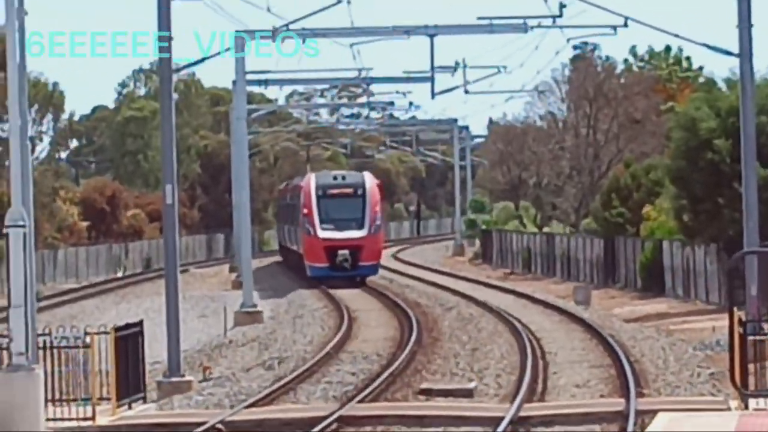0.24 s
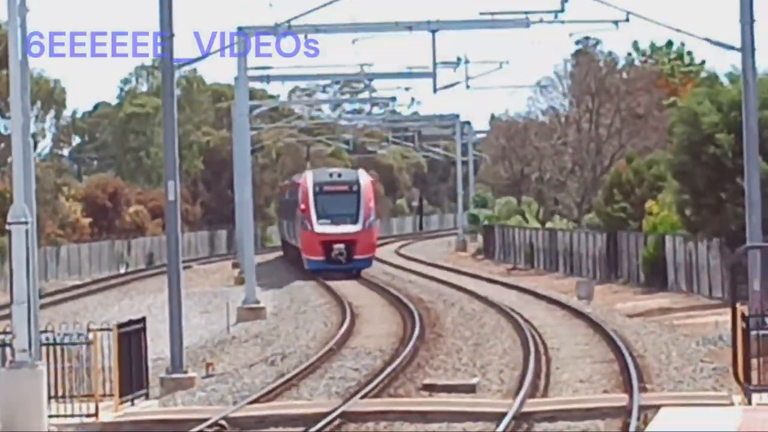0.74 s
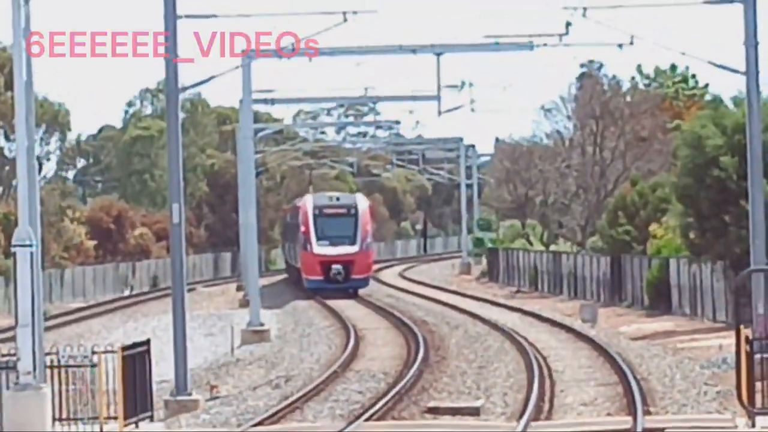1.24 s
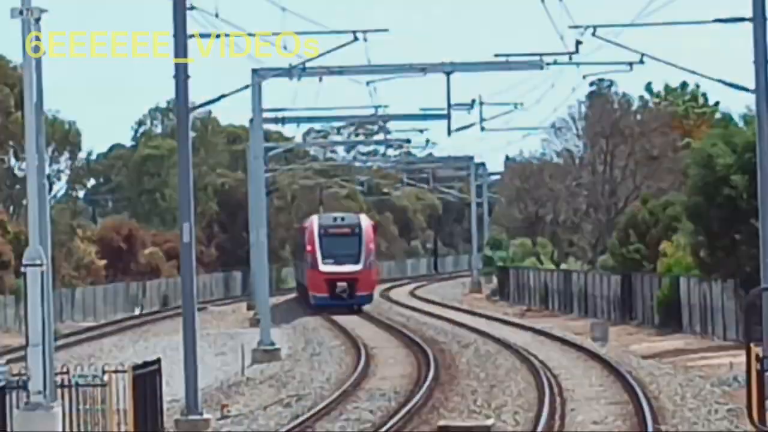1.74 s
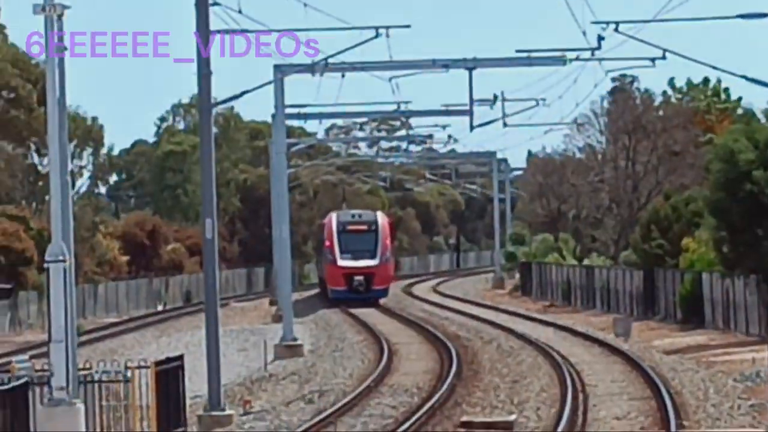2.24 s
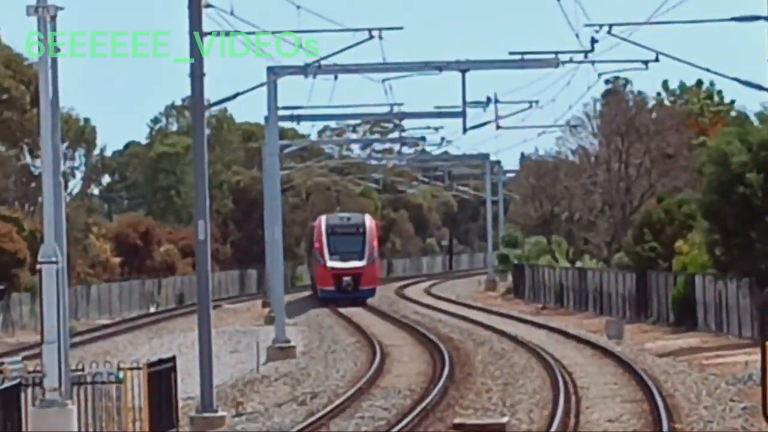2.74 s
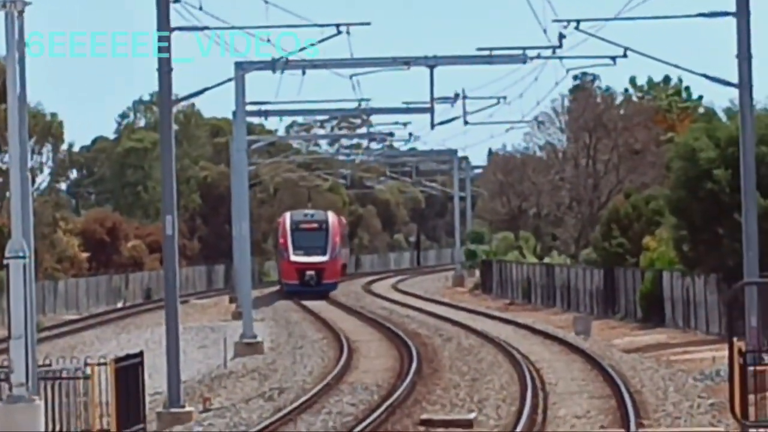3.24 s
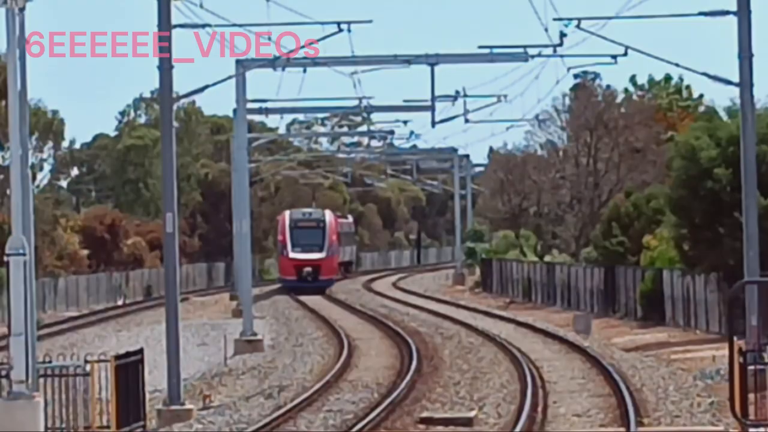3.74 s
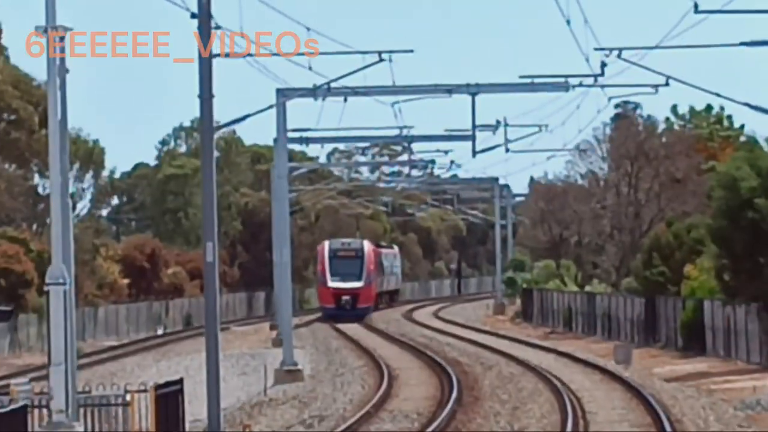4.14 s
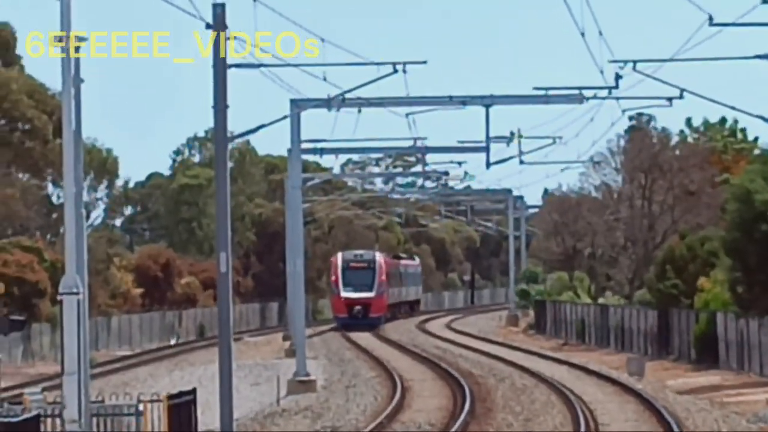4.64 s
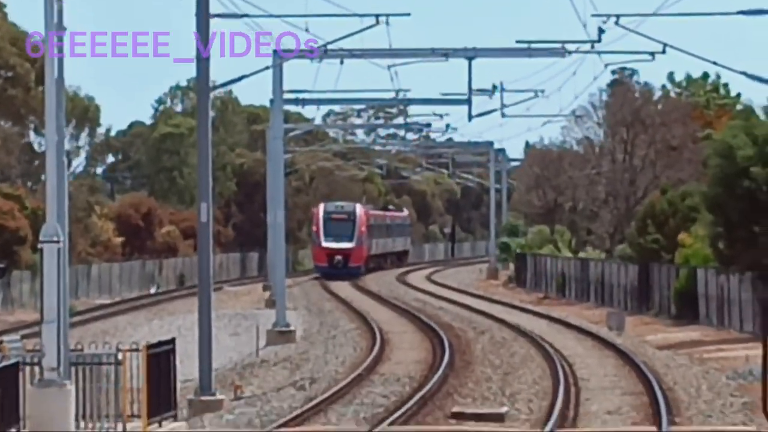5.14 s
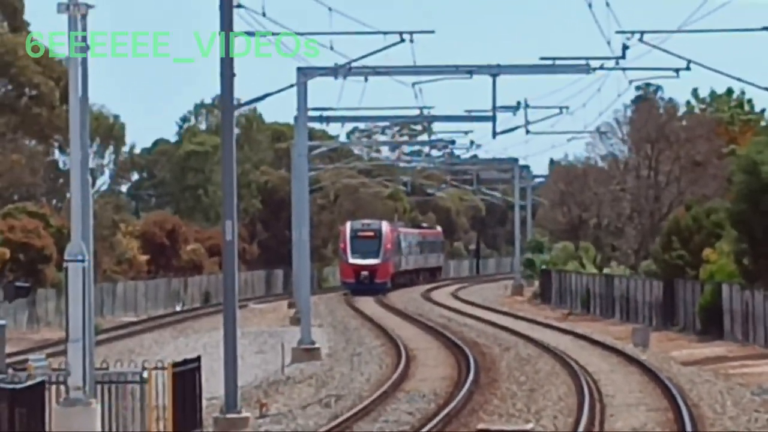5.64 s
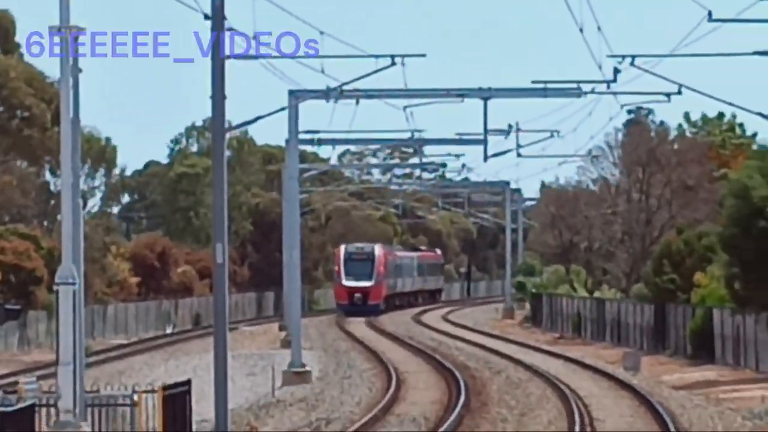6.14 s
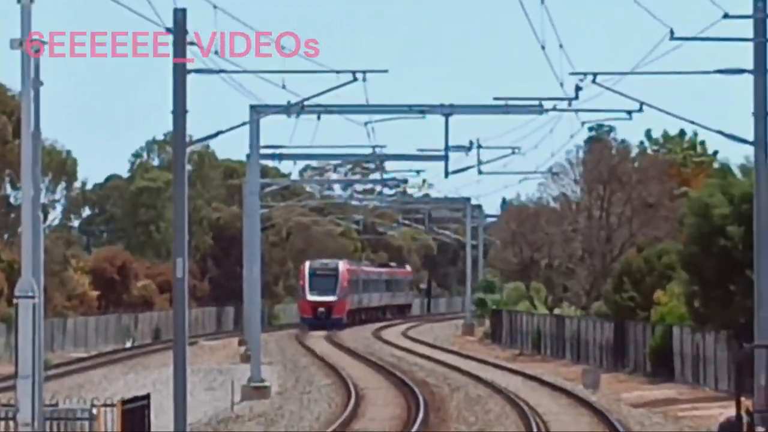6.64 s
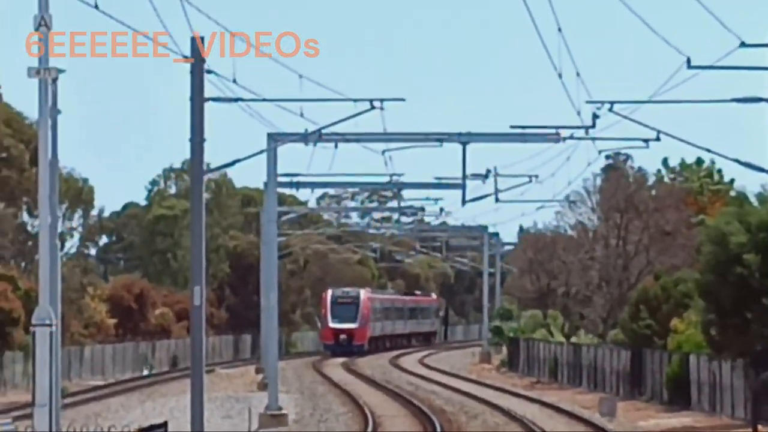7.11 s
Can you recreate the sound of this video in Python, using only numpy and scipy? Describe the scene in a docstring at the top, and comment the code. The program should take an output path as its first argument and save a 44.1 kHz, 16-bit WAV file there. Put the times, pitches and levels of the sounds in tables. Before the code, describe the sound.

An electric train rolls away round a bend, its roar fading to a faint hum while birds chirp nearby and wind buffets the microphone early.

```python
"""Beside a railway track on a breezy day: an electric train rolls away round a bend.
Its roar, rails and wheels are noise through wandering resonances, sinking to a hum over a low rumble.
Two small birds whistle upward chirps nearby, scattered by leaves, posts and trees; others peep far off.
Early on, wind noise and single eddies buffet two microphone ports, each on its own; one late eddy is faint.
Noise bursts make puffs, rustles and ticks; fine grains sizzle, thin pips hold their pitch, air washes."""
import sys
import numpy as np
from scipy import signal
from scipy.fft import rfft, irfft, next_fast_len
from scipy.io import wavfile
from scipy.ndimage import uniform_filter1d

SR = 44100
rng = np.random.default_rng(int(sys.argv[2]) if len(sys.argv) > 2 else 0)


def pcm_store(signal):
    """Save signal as 16-bit PCM."""
    levels = np.round(np.clip(np.atleast_2d(signal), -1, 1) * 32767)
    wavfile.write(sys.argv[1], SR, levels.astype(np.int16).T)


N = 325017

FRAME = 2048  # samples
HOP = FRAME // 4
HZ = np.fft.rfftfreq(FRAME, 1 / SR)
TIMES = np.arange(N // HOP + 3) * HOP / SR

# likeness of the two ports for distant sound: f/Hz, likeness/0-1
LIKENESS = [(40, 0.79), (250, 0.85), (470, 0.91), (650, 0.54), (900, 0.67), (1400, 0.04), (2300, 0.64),
            (3000, 0), (7000, 0)]
LEAVES_HZ = 4000  # foliage scatters overtones above this
RUSTLE_LEFT_DB = -25  # left minus right, rustles and sizzle


def amp(db):
    """Decibels to gain."""
    return 10 ** (np.asarray(db) / 20)


def unit(x):
    """Scales to rms 1."""
    return x / np.sqrt(np.mean(x ** 2) + 1e-20)


def read(points, hz):
    """Reads a spectrum on a log-frequency axis."""
    f, value = np.transpose(points)
    return np.interp(np.log(hz + 1), np.log(f + 1), value)


def follow(rows, axis):
    """Reads one column of a curve at every frame."""
    rows = np.array(rows)
    return np.interp(TIMES, rows[:, 0], rows[:, axis])[:, None]


def add(mix, s, sound):
    """Mixes a sound in at time s."""
    part = mix[:, max(0, round(s * SR)):][:, :sound.shape[1]]
    part += sound[:, :part.shape[1]]


def bell(f, hz, width):
    """Gain of a resonance."""
    return 1 / (1 + (2.39 * (f - hz) / width) ** 2)


def total(gain):
    """Rms of a spectral density, frame by frame."""
    return np.sqrt((gain ** 2).sum(-1, keepdims=True) * HZ[1])


def patches(size, count):
    """A smooth random field of rms 1; its kernel is size frames by count bins."""
    field = rng.standard_normal((len(TIMES), len(HZ)))
    kernel = np.outer(np.hanning(size), np.hanning(count))
    return unit(signal.fftconvolve(field, kernel, "same"))


def flutter(count):
    """A smooth random wobble within +-1 per port, changing over about count samples."""
    raw = rng.standard_normal((2, N))
    return np.tanh(unit(signal.fftconvolve(raw, np.hanning(count)[None], "same")))


def drift(size):
    """A smooth random swell of rms 1, changing over about size frames."""
    return unit(np.convolve(rng.standard_normal(len(TIMES)), np.hanning(size), "same"))[:, None]


def noise(density, likeness, lag_ms):
    """Stereo noise of a given density; the left port hears the shared part later."""
    a, b, c, d = rng.standard_normal((4, len(TIMES), len(HZ)))
    left = a + 1j * b
    same = np.clip(likeness, 0, 1)
    shared = same * left * np.exp(2j * np.pi * HZ * lag_ms / 1000)
    right = shared + np.sqrt(1 - same ** 2) * (c + 1j * d)
    z = np.array([left, right]) * density * np.sqrt(1.5 * HZ[1])
    return signal.istft(z.swapaxes(1, 2), nperseg=FRAME, noverlap=FRAME - HOP)[1][:, :N]


def burst(hz, width, count):
    """A stretch of noise in one resonance, rms 1."""
    gain = bell(np.fft.rfftfreq(count, 1 / SR), hz, width)
    return unit(irfft(rfft(rng.standard_normal(count)) * gain, count))


def swell(s, length, db, hz, width):
    """Band noise that rises and falls around time s."""
    t = np.arange(-SR, SR) / SR
    out = np.zeros((1, N + 2 * SR))  # 1 s of padding at each end
    envelope = np.exp(-(t / length) ** 2)
    add(out, s, (amp(db) * burst(hz, width, count=len(t)) * envelope)[None])
    return out[:, SR:SR + N]


def echoes(x, t60, wet_db, gap_s):
    """Nearby surfaces scatter a short decaying tail of sparse random reflections."""
    t = np.arange(SR // 2) / SR
    taps = rng.standard_normal((2, len(t))) * (rng.random((2, len(t))) < 2000 / SR) * (t > gap_s)
    tail = taps * amp(-60 * t / t60)
    tail = tail / np.linalg.norm(tail, axis=1, keepdims=True)
    return x + amp(wet_db) * signal.fftconvolve(x, tail, axes=1)[:, :N]


def rolling(modes, level_db, mottle_db):
    """Rough steel on steel feeds wandering resonances; moving air and ground echoes mottle them."""
    wander_hz = 13  # rms
    parts = []
    for hz, width, db, fade, side_db in modes:
        resonance = bell(HZ, hz + wander_hz * drift(size=15), width)
        parts.append((amp(db - fade * TIMES[:, None]) * resonance, side_db))
    left = np.sqrt(sum(g ** 2 for g, side_db in parts))
    right = np.sqrt(sum((g * amp(side_db)) ** 2 for g, side_db in parts))
    mottle = amp(mottle_db * patches(size=9, count=8) + 1.2 * patches(size=61, count=5))
    # the level curve sets the left port's rms
    density = np.array([left, right]) * mottle * amp(level_db) / total(left * mottle)
    return noise(density, read(LIKENESS, HZ), lag_ms=0.813)


def train():
    """Roar, rail song and wheel hiss sink with distance and surge a little in the moving air."""
    # resonances: f/Hz, width/Hz, relative level/dB, relative fade/(dB/s), right minus left/dB
    roar_modes = [(593, 45, 0.5, 5.5, -0.5), (670, 72, 2.5, 4.5, -8), (747, 113, 4.5, 6, -12),
                  (838, 70, -2, 6, -16)]
    rail_modes = [(1122, 68, -6, 4.44, -3.5), (1230, 84, 6, 5.3, -11.5), (1362, 25, 0, 1.55, -14),
                  (1450, 98, -4.5, 0.7, -13.5)]
    wheel_modes = [(1717, 84, -6.5, 3.3, -4), (1880, 153, -4, 2.86, -17.5), (2407, 277, 1.5, 2.29, -22),
                   (2864, 453, -4.5, 3.2, -19), (3310, 170, -33, 2.6, 10.5), (3764, 194, -15.5, 2.5, -23),
                   (4336, 660, -22, 3.25, -10.5)]
    # levels before trim and surge; the roar comes and goes as the train rounds the bend: t/s, level/dB
    roar_curve = [(0.0, -47.5), (0.38, -43), (0.5, -45.5), (0.8, -40.5), (1.02, -36.5), (1.12, -43),
                  (1.22, -40.5), (1.39, -40), (1.48, -47.5), (1.65, -39.5), (2.0, -42.5), (2.35, -40.5),
                  (2.7, -45.5), (3.2, -49.5), (3.5, -44), (3.92, -47.5), (4.1, -54.5), (4.25, -57),
                  (4.5, -46.5), (4.77, -47.5), (4.9, -58), (5.06, -49), (5.1, -59), (5.21, -52),
                  (5.35, -61), (6.0, -57), (6.35, -62.5), (6.8, -64), (6.98, -50.5), (7.15, -60),
                  (7.35, -66)]
    rail_curve = [(0.0, -48), (0.65, -45.5), (1.0, -48.5), (1.25, -52.5), (1.55, -54.5), (1.66, -49.5),
                  (1.8, -51.5), (2.0, -46), (2.55, -55), (4.7, -51), (5.55, -54), (5.73, -68), (5.89, -54),
                  (6.12, -59.5), (6.2, -66), (6.29, -57), (6.41, -62), (6.5, -49), (6.67, -62.5),
                  (6.78, -55.5), (6.93, -51), (7.0, -58.5), (7.17, -55), (7.35, -63.5)]
    wheel_curve = [(0.0, -45), (0.45, -46), (0.8, -44), (1.42, -47.5), (1.6, -50.5), (1.82, -51),
                   (2.05, -47.5), (2.4, -52), (3.0, -51.5), (4.9, -54.5), (5.7, -61), (7.35, -64)]
    # rail flares: t/s, length/s, level/dB, f/Hz, width/Hz
    flares = [(0.64, 0.15, -44.5, 1500, 620), (0.96, 0.13, -49.5, 1830, 600)]
    mottle_db, surge_db, grit_db, flare_right_db = 4.0, 1.3, 3, -32

    def layer(modes, curve, trim_db):
        """One part of the train at its level, surging in the moving air."""
        level_db = follow(curve, axis=1) + surge_db * drift(size=15) + trim_db
        return rolling(modes, level_db, mottle_db)

    roar = layer(roar_modes, roar_curve, trim_db=-.3)
    rails = layer(rail_modes, rail_curve, trim_db=-.6)
    wheels = layer(wheel_modes, wheel_curve, trim_db=-.2)
    # rough wheel treads make the flare grainy
    grit = unit(amp(grit_db * (flutter(count=1501) + flutter(count=301))))
    flare = sum(swell(*row) for row in flares) * grit
    return roar + rails + wheels + flare * amp([[0], [flare_right_db]])


def rumble():
    """A deep drone, much the same at both ports; its narrow band makes it throb."""
    # spectrum: f/Hz, relative level/dB
    spectrum = [(15, -44), (30, -25), (42, 8.5), (55, 6.5), (67, 13.5), (80, -19.5), (100, -1),
                (125, -12.5), (170, -21.5), (215, -19), (260, -75), (400, -93)]
    # level before port offsets: t/s, level/dB
    curve = [(0.0, -39), (3.2, -40.5), (3.7, -38.5), (4.05, -41), (4.6, -42), (5.1, -40.5), (5.27, -49),
             (5.45, -36), (5.6, -43.5), (5.85, -37.5), (6.05, -45.5), (6.25, -41.5), (6.7, -39.5),
             (6.85, -42.5), (7.15, -36.5), (7.35, -42.5)]
    tone = amp(read(spectrum, HZ))
    density = tone / total(tone) * amp(follow(curve, axis=1))
    return noise(density, read(LIKENESS, HZ), lag_ms=0.2) * amp([[2.2], [-1.2]])


def air():
    """The steady wash of the outdoors: mottled in the middle, with a fine flicker at the top."""
    # mean density at each port: f/Hz, level/(dB per Hz)
    left_port = [(100, -69.5), (260, -91.5), (335, -87), (480, -89), (1000, -105.5), (1850, -91),
                 (2700, -102), (3200, -109), (4900, -113), (5600, -111), (7000, -124), (8300, -119),
                 (9600, -131), (15000, -138)]
    right_port = [(100, -83), (260, -91.5), (400, -100.5), (480, -90), (1000, -100), (2000, -103),
                  (4900, -114), (5700, -112), (6600, -118), (7800, -119), (9200, -115), (10200, -109),
                  (11800, -122), (15500, -127)]
    depth_db = read([(200, 1.5), (1000, 2.4), (3000, 3.4), (5000, 3.0), (8000, 1.2)], HZ)
    mottle_db = depth_db * patches(size=15, count=11)
    flicker_db = read([(3000, 1.5), (9000, 2.4)], HZ) * patches(size=4, count=35)
    ports_db = np.array([read(left_port, HZ), read(right_port, HZ)])[:, None]
    density = amp(ports_db + mottle_db + flicker_db)
    return noise(density, read(LIKENESS, HZ), lag_ms=0.96)


def wind():
    """Lumpy turbulence, unrelated between ports and brighter when strong, that dies away."""
    # breeze before exposure and lull: t/s, left level/dB, right level/dB
    breeze = [(0.0, -40.5, -38), (0.15, -31.5, -56), (0.7, -38, -33.5), (1.2, -34.5, -35.5),
              (1.4, -35.5, -30.5), (1.65, -35, -37.5), (2.05, -44, -28), (2.2, -48, -28), (2.6, -51, -62)]
    # spectrum at -28 dB, shifting with level: f/Hz, relative level/dB
    spectrum = [(15, -4), (35, -32), (65, 7.5), (110, 1.5), (150, -1.5), (200, -17), (280, -35),
                (450, -100), (900, -106)]
    left_db, right_db = 5, 1.5  # how exposed each port is
    lull_s, lull_db_per_s, lumps_db = 2.98, 32, 3.5
    level_db = np.array([follow(breeze, axis=1) + left_db, follow(breeze, axis=2) + right_db])
    level_db = level_db - lull_db_per_s * np.maximum(TIMES - lull_s, 0)[:, None]
    tone = amp(read(spectrum, HZ * amp(-.15 * (level_db + 28.0))))
    out = noise(tone / total(tone) * amp(level_db), 0, lag_ms=0)
    out = out * unit(amp(lumps_db * flutter(count=2001)))
    return .16 * np.tanh(out / .16)  # soft ceiling on the steady breeze


def buffets():
    """An eddy swings the pressure a few times; the hardest ones also break up into a puff."""
    # eddies: t/s, swing level/dB, f/Hz, length/s, side/0 left to 1 right
    eddies = [(.041, -18.5, 128, 0.0063, 1), (0.178, -19, 95, 0.0095, 0.014), (0.895, -15, 115, 0.0044, 0),
              (1.385, -21, 113, 0.013, 1), (1.47, -18.5, 139, 0.019, 1), (1.51, -19, 182, 0.0058, 1),
              (1.673, -17, 72.4, 0.01, 0.65), (2.006, -21, 180, 0.005, 0.97), (2.065, -18, 162, .0045, 1),
              (2.184, -22, 250, .005, 1), (2.202, -13.5, 123, .024, .97), (2.202, -17, 230, .005, 1),
              (2.207, -32, 430, .006, 1), (2.203, -37, 580, .006, 1), (2.228, -27, 200, .007, 1),
              (2.364, -28, 154, 0.0054, 1), (2.404, -17.5, 120, 0.0041, 1), (5.014, -35, 140, 0.015, 1)]
    # fine turbulence inside an eddy: f/Hz, relative level/dB
    hiss = [(100, 6), (240, 11), (370, -3), (470, -18), (600, -12), (800, -36), (2000, -64), (8000, -120)]
    out, t = np.zeros((2, N)), np.arange(-4096, 4096) / SR
    colour = amp(read(hiss, np.fft.rfftfreq(len(t), 1 / SR)))
    for s, db, hz, length, side in eddies:
        puff = unit(irfft(rfft(rng.standard_normal(len(t))) * colour))
        swing = np.cos(2 * np.pi * (hz * t + rng.random())) + 0.6 * amp(db) * puff
        side = np.clip(side, 0, 1)
        envelope = 1 / np.cosh(2.18 * t / length)
        add(out, s, amp(db) * swing * envelope * np.array([[1 - side], [side]]))
    return np.roll(out, -len(t) // 2, axis=1)  # centres each eddy on its time


def chirps(rows, rise, bend, partials_db, crest, rough, throat_hz):
    """Each chirp is a quick upward whistle; higher partials peak earlier and thin out at the top."""
    # how strongly each port takes the pitches: f/Hz, gain/dB
    left_port = [(2300, 5.5), (2900, 2), (3400, 7), (5000, -15), (5400, -5.5), (5750, -6.5), (6100, -12),
                 (6600, -10), (8100, -21)]
    right_port = [(2300, -42), (2950, -35), (3400, -21), (5000, -27), (5450, -7.5), (5750, -8.5),
                  (6100, -14), (6600, -4), (8100, -31)]
    out = np.zeros((2, N))
    for s, length, top_hz, db, side_db in rows:
        u = np.linspace(0, 1, round(length * SR))
        waver = unit(uniform_filter1d(rng.standard_normal(SR // 4), size=40))[:len(u)]
        hz = top_hz * (1 - rise * (1 - u) ** bend) * (1 + rough * waver)
        phase = 2 * np.pi * np.cumsum(hz) / SR
        call = np.zeros((2, len(u)))
        for k, part_db in enumerate(partials_db, 1):
            ports_db = np.array([read(left_port, k * hz), read(right_port, k * hz) + side_db])
            throat = 1 / (1 + (k * hz / throat_hz) ** 30)
            envelope = abs(np.sin(np.pi * u ** (crest / k ** .3))) ** 1.3
            call += amp(db + part_db + ports_db) * throat * envelope * np.sin(k * phase)
        add(out, s + .0013, call * [[1], [0]])  # the left port hears it later
        add(out, s, call * [[0], [1]])
    return out


def leaves(x):
    """Foliage close to a bird blurs its high overtones more than its fundamental."""
    high = signal.sosfilt(signal.butter(2, LEAVES_HZ, "high", fs=SR, output="sos"), x)
    return x - high + echoes(high, t60=.12, wet_db=-3.5, gap_s=.002)


def bounces(x, extra_db):
    """Posts and the tree line throw each call back as ragged, duller clusters of echoes."""
    # echo clusters: delay/s, spread/s, level/dB before extra_db and low-pass
    cluster_rows = [(.018, .014, -8.5), (.105, .026, -11.5)]
    taps_per_s = 500
    t = np.arange(SR // 4) / SR
    taps = rng.standard_normal((2, len(t))) * (rng.random((2, len(t))) < taps_per_s / SR)
    tail = np.zeros((2, len(t)))
    for delay, spread, db in cluster_rows:
        cluster = taps * np.exp(-((t - delay) / spread) ** 2)
        tail += amp(db + extra_db) * cluster / (np.linalg.norm(cluster, axis=1, keepdims=True) + 1e-9)
    tail = signal.sosfilt(signal.butter(2, LEAVES_HZ, "low", fs=SR, output="sos"), tail)
    return signal.oaconvolve(x, tail, axes=1)[:, :N]


def birds():
    """One bird sings on its fundamental, the other mostly an octave above its own; others peep far off."""
    # chirps before partial and port gains: t/s, length/s, last f/Hz, level/dB, right offset/dB
    weets = [(0.452, 0.046, 3036, -38, 6.5), (1.247, 0.048, 3030, -42, 6),
             (1.908, 0.045, 3080, -40.5, 10.5), (2.671, 0.036, 3057, -39.5, 3),
             (3.36, 0.047, 3035, -42.5, 5.5), (4.13, 0.029, 2940, -43, 6), (4.811, 0.0375, 3004, -42, 1.5),
             (5.572, 0.031, 2990, -45.5, 4.5), (6.297, 0.033, 2986, -47, -15),
             (7.033, 0.062, 2998, -50.5, 4)]  # the lower bird
    tsips = [(.812, 0.037, 3300, -58, 6), (1.868, .027, 2850, -58, 0), (2.205, 0.032, 2900, -56.5, 4),
             (3.412, 0.032, 3000, -41, 4), (3.895, 0.041, 3280, -53.5, 1), (4.012, 0.029, 3200, -41, 1),
             (4.695, 0.036, 2980, -50.5, -10), (4.732, 0.036, 3100, -45.5, -4),
             (5.492, 0.034, 3120, -56, 2), (5.708, 0.03, 2900, -58, 10.5), (6.106, 0.024, 3120, -66, 7),
             (6.138, 0.036, 2980, -64, 5), (6.255, 0.034, 3100, -66, 2), (6.628, 0.04, 3400, -64, 1),
             (6.758, 0.034, 3100, -64.5, 2), (7.098, 0.034, 3020, -63, 2), (7.275, 0.032, 2980, -68, 2)]  # the other, thin
    # faint peeps from the trees, before the same gains: t/s, length/s, last f/Hz, level/dB
    peeps = [(0.836, 0.029, 3280, -56), (1.74, 0.026, 3630, -62), (2.015, 0.035, 4540, -53),
             (2.703, 0.03, 3850, -55), (3.415, 0.033, 3980, -59), (3.92, 0.025, 3340, -60),
             (4.037, 0.042, 3600, -69), (6.518, 0.035, 2560, -63), (7.068, 0.042, 3770, -68)]
    # weets weaker than far_db come more by reflection, this much wetter
    far_db, far_wet_db = -42, 3
    weet_shape = dict(rise=.22, bend=1.35, partials_db=(2, -3.5), crest=1.1, rough=.016, throat_hz=5700)
    tsip_shape = dict(rise=.24, bend=1.1, partials_db=(-9.5, 3.5, -3), crest=1.9, rough=.016,
                      throat_hz=8500)
    peep_shape = dict(rise=.083, bend=4.2, partials_db=(3,), crest=.91, rough=.017, throat_hz=8500)
    near = chirps([row for row in weets if row[3] >= far_db], **weet_shape)
    far = chirps([row for row in weets if row[3] < far_db], **weet_shape)
    near += chirps(tsips, **tsip_shape)
    far += chirps([(*row, 0) for row in peeps], **peep_shape)
    t60, wet_db, gap_s = .33, -9.5, .012
    calls = echoes(leaves(near), t60, wet_db, gap_s)
    calls = calls + echoes(leaves(far), t60, wet_db + far_wet_db, gap_s)
    return calls + bounces(near, extra_db=-4) + bounces(far, extra_db=far_wet_db)


def low_swells():
    """Soft, narrow-band noise swells of low sound, nearer the left port: low puffs, a brief swell of the
    train's roar at 590 Hz and a small gust."""
    # low swells: t/s, length/s, level/dB, f/Hz
    rows = [(0.588, 0.024, -52, 330), (2.774, 0.042, -56.5, 330), (6.028, 0.036, -54.5, 590),
            (7, 0.042, -52, 337), (7.1, 0.13, -45.5, 129)]
    width_hz, right_db = 59, -25
    return sum(swell(*row, width_hz) for row in rows) * amp([[0], [right_db]])


def sizzle():
    """A sputter of tiny high grains, each with its own pitch, length and strength."""
    # level at the right port: t/s, level/dB
    curve = [(0.8, -80), (1.05, -83), (1.52, -73), (1.6, -66), (1.69, -66.5), (1.8, -64.5), (1.86, -67),
             (1.9, -68.5), (2.0, -71), (2.3, -72.5), (2.459, -80), (2.58, -65.5), (2.721, -80), (2.88, -74),
             (3.099, -80)]
    # filter on the grains: f/Hz, gain/dB
    spectrum = [(6000, -6), (7800, -10.5), (8600, -6.5), (9400, -7), (10100, 4.5), (11300, -12),
                (12300, -28), (13000, -28)]
    grains_per_s, grain_s, grain_hz, spread_db = 4200, (.003, .018), (6000, 13000), 18
    out, (times, level_db) = np.zeros((1, N)), np.transpose(curve)
    start, end = times[0], times[-1]
    for when, pitch, span, strength in rng.random((int(grains_per_s * (end - start)), 4)):
        t = np.arange(0, np.interp(span, [0, 1], grain_s), 1 / SR)
        hz = np.interp(pitch, [0, 1], grain_hz)
        grain = np.hanning(len(t)) * np.sin(2 * np.pi * hz * t)
        add(out, start + when * (end - start), amp(-spread_db * strength) * grain[None])
    size = next_fast_len(N)
    gain = amp(read(spectrum, np.fft.rfftfreq(size, 1 / SR)))
    out = irfft(rfft(out, size) * gain, size)[:, :N]
    out = out / np.std(out[:, int(start * SR):int(end * SR)])
    return out * amp(np.interp(np.arange(N) / SR, times, level_db)) * amp([[RUSTLE_LEFT_DB], [0]])


def rustles():
    """Ragged high noise swells beside the right port, gritty with tiny decaying snaps."""
    # rustles: t/s, length/s, level/dB, f/Hz, width/Hz
    rows = [(2.066, .008, -56, 10600, 3800), (2.082, .014, -60, 10300, 3400),
            (2.112, .012, -63.5, 10100, 3200), (2.3, .06, -75, 10500, 4500), (2.55, .061, -68, 10300, 4000),
            (2.615, .03, -61, 10300, 4400), (3.075, .026, -67, 9400, 6000)]
    snaps_per_s, snap_s, snap_db, ragged_db = 480, .0006, 6.5, 4
    snaps = (rng.random(N) < snaps_per_s / SR) * rng.uniform(.4, 1, N)
    crackle = signal.lfilter([1], [1, -np.exp(-1 / (snap_s * SR))], snaps)
    ragged = unit(amp(ragged_db * flutter(count=1901)) * (1 + amp(snap_db) * crackle))
    return sum(swell(*row) for row in rows) * amp([[RUSTLE_LEFT_DB], [0]]) * ragged


def pips():
    """Thin whistles that hold one pitch."""
    # pips: t/s, length/s, f/Hz, left peak level/dB, right minus left/dB
    rows = [(5.3, .035, 10250, -84, 17), (5.343, .028, 10230, -80, 21), (5.762, .045, 4640, -68, -2),
            (6.005, .035, 4660, -69, -12), (6.418, .022, 10200, -82, 16), (6.805, .045, 4340, -73, -10),
            (7.32, .045, 4170, -72, -10)]
    out = np.zeros((2, N))
    for s, length, hz, db, side_db in rows:
        t = np.arange(0, length, 1 / SR)
        pip = amp(db) * np.sin(np.pi * t / length) * np.sin(2 * np.pi * hz * t)
        add(out, s, pip * amp([[0], [side_db]]))
    return out


def ticks():
    """Small dry noise bursts, each in one resonance, that decay briefly."""
    # ticks close by: t/s, left starting level/dB, f/Hz, width/Hz, ring/s, right minus left/dB
    rows = [(6.172, -57, 4080, 900, .018, -9), (6.198, -55, 4130, 800, .012, -9),
            (6.211, -62, 4150, 700, .012, -9), (6.386, -45, 2000, 420, .011, -19),
            (6.386, -53, 5400, 2600, .0011, -9)]
    out, t = np.zeros((2, N)), np.arange(SR // 8) / SR
    for s, db, hz, width, ring, side_db in rows:
        tick = amp(db) * burst(hz, width, count=len(t)) * np.exp(-t / ring)
        add(out, s, tick * amp([[0], [side_db]]))
    return out


def scene():
    """Train, rumble and air far off; birds, ticks, rustles and wind close by."""
    small = echoes(ticks() + pips(), t60=0.036, wet_db=-5, gap_s=.004)
    nearby = birds() + low_swells() + sizzle() + rustles() + small
    return train() + rumble() + air() + wind() + buffets() + nearby


def record(dry):
    """Eases both ends over 10 ms and low-passes the band."""
    edge_hz = 15650
    ease = np.minimum(np.minimum(np.arange(N), np.arange(N)[::-1]) / (.01 * SR), 1)
    lowpass = signal.firwin(511, edge_hz, window=("kaiser", 9), fs=SR)
    return signal.oaconvolve(dry * ease, lowpass[None], "same")


dry = scene()
out = record(dry)
pcm_store(out)
```